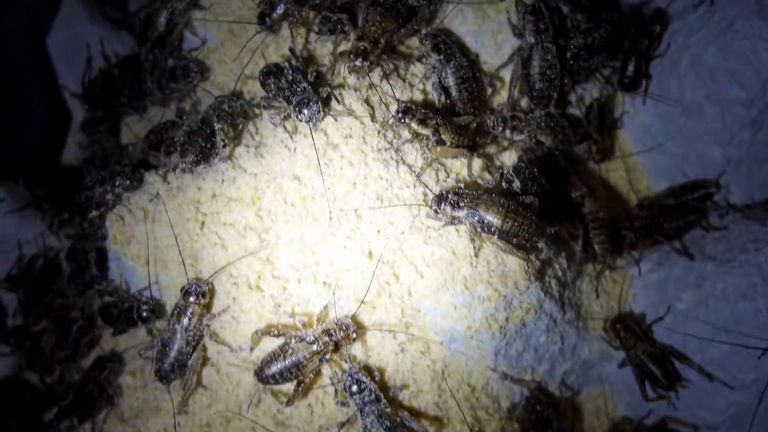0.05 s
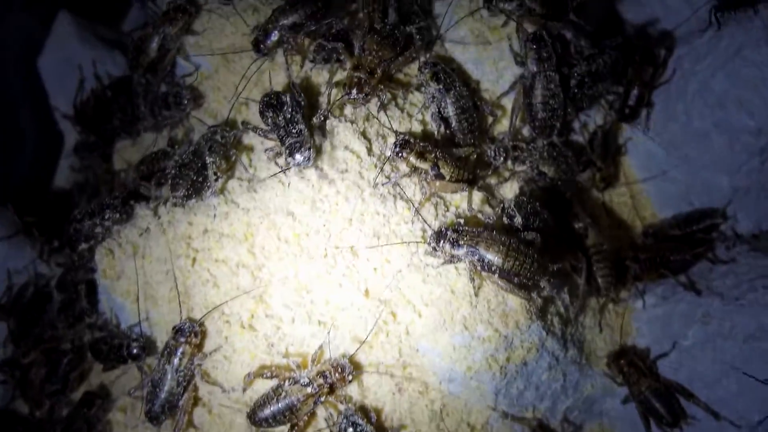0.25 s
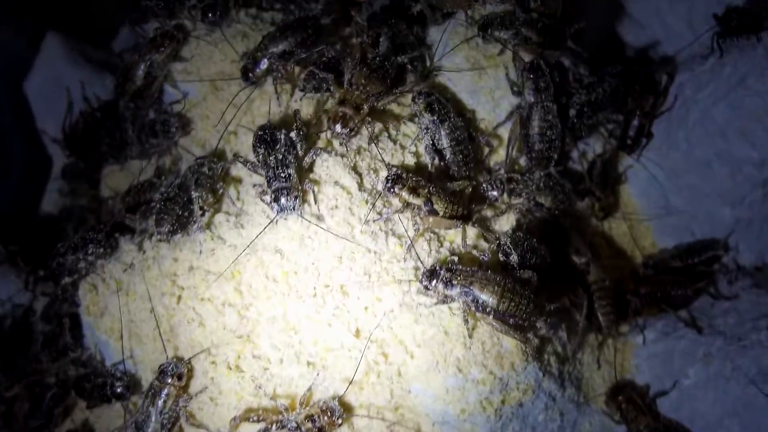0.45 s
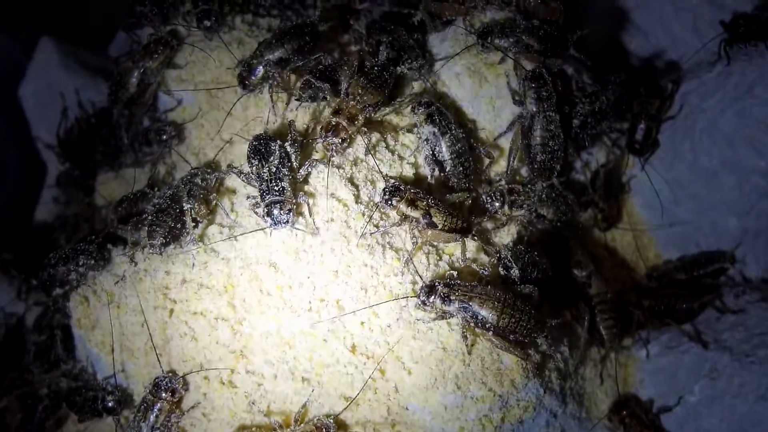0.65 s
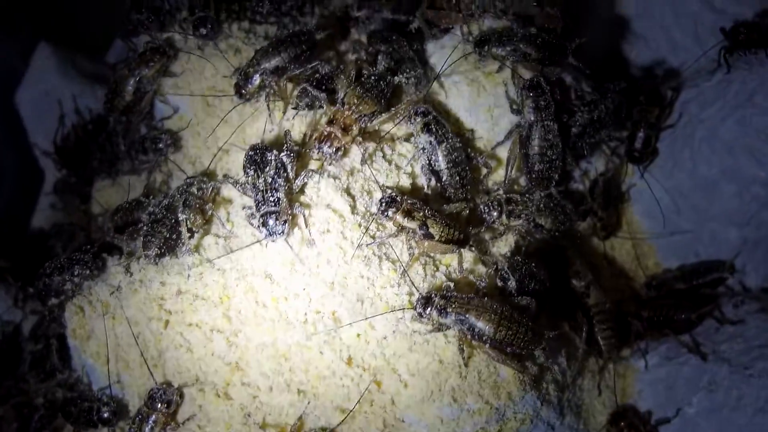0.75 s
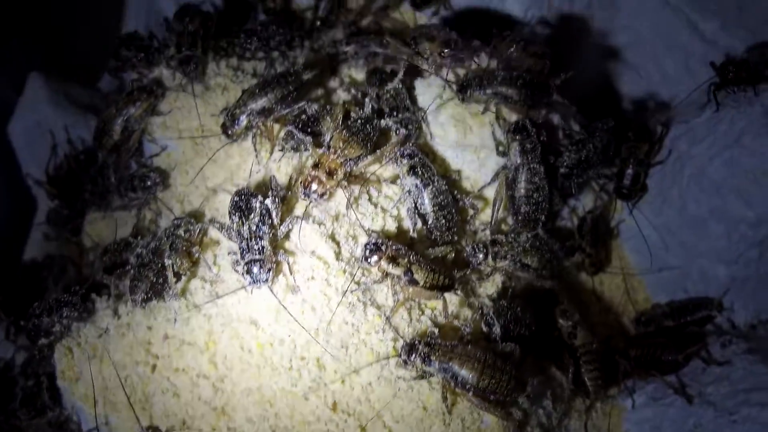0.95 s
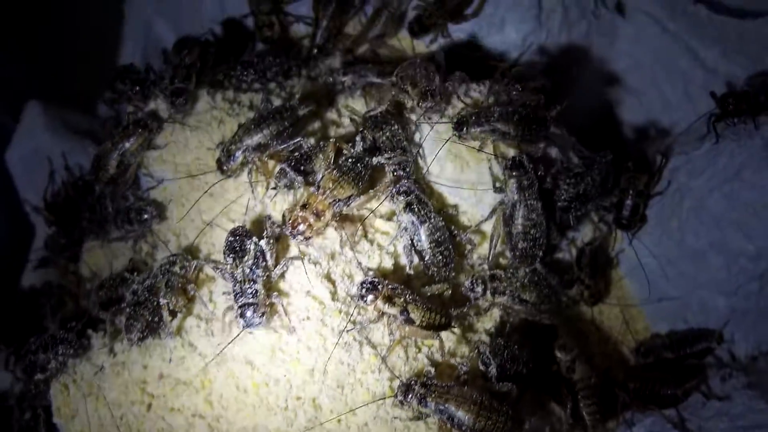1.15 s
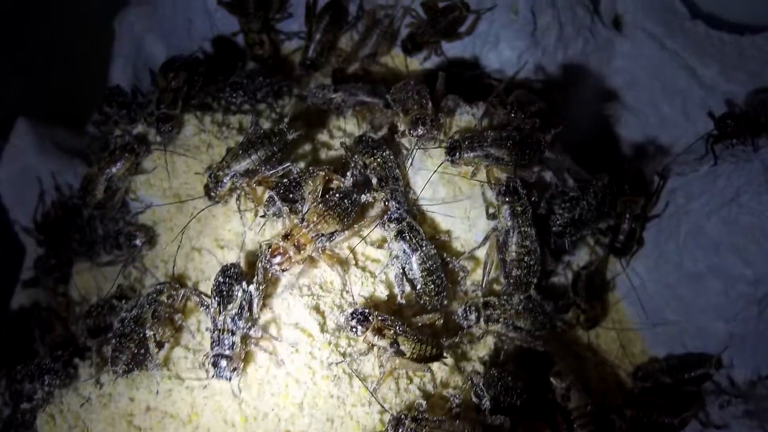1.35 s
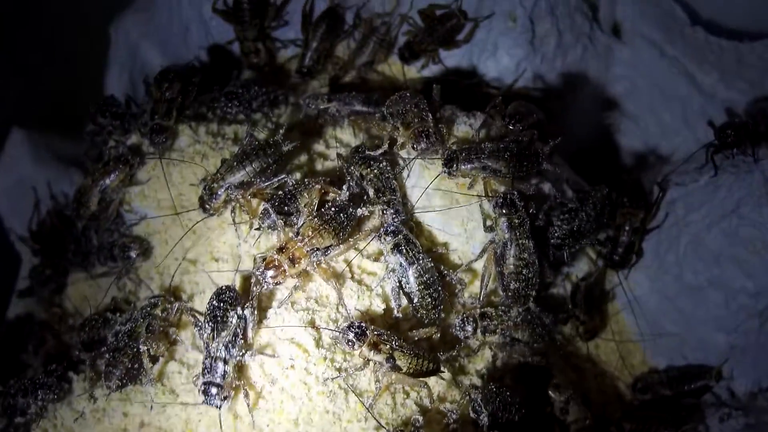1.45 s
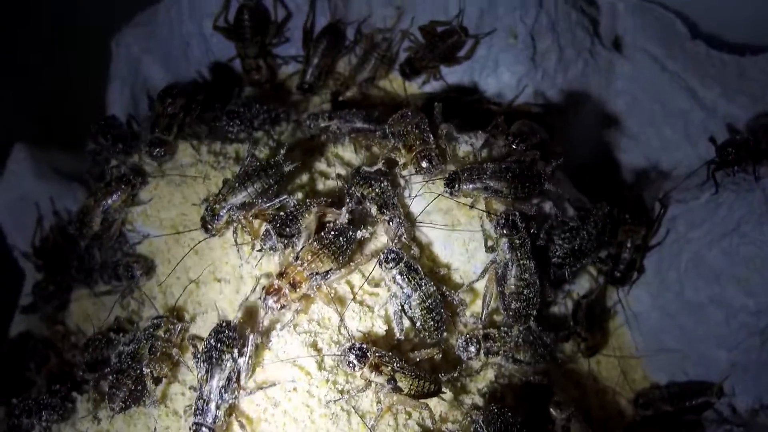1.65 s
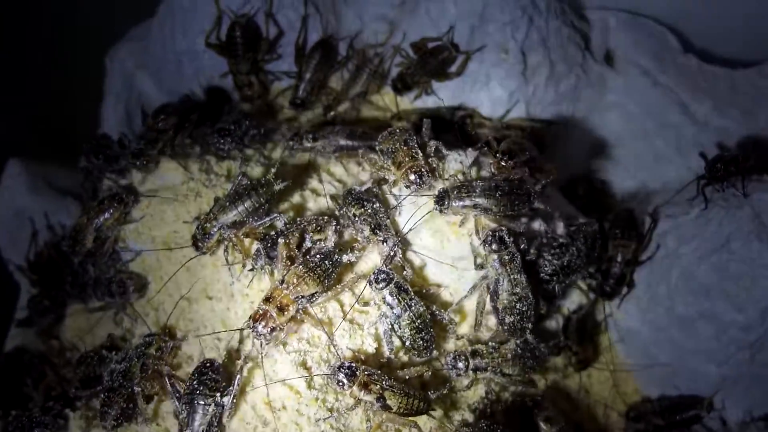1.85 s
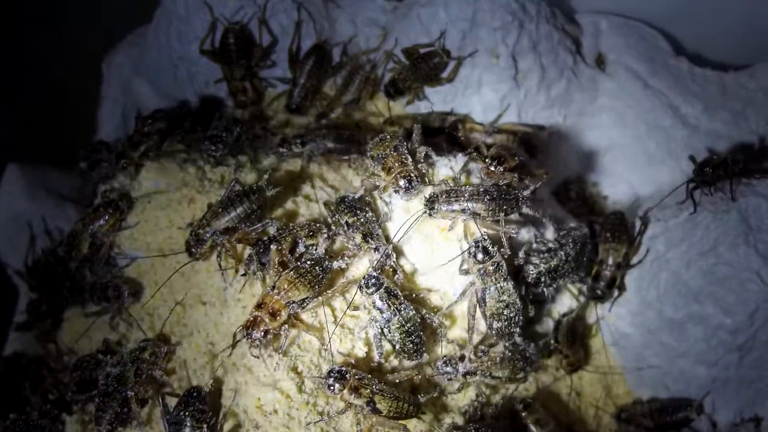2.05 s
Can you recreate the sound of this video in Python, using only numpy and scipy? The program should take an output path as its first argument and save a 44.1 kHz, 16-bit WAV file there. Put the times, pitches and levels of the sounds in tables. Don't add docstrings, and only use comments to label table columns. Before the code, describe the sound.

Crickets crawling in a plastic tub, claws ticking and scraping over low hum, one early hollow knock

```python
import sys
import numpy as np
from scipy import signal
from scipy.fft import rfft, irfft
from scipy.io import wavfile
from scipy.ndimage import uniform_filter1d

SR = 44100
rng = np.random.default_rng(int(sys.argv[2]) if len(sys.argv) > 2 else 0)


def invert_db(x):
    u = np.asarray(x, float) / 20
    return 10 ** u


def materialize(psi):
    bounded = np.clip(np.atleast_2d(psi).T, -1, 1)
    quanta = np.round(bounded * 32767).astype(np.int16)
    wavfile.write(sys.argv[1], SR, quanta)


N = 92610


def band(x, hz, width, times=1):
    hz = min(hz, 0.45 * SR)
    b, a = signal.iirpeak(hz, max(hz / width, 0.3), fs=SR)
    for _ in range(times):
        x = signal.lfilter(b, a, x)
    return x


def level(x, db):
    return x * invert_db(db) / np.sqrt(np.mean(x ** 2))


def walk(rate):
    k = int(SR / rate)
    steps = np.repeat(rng.standard_normal(N // k + 1), k)
    return 1.13 * uniform_filter1d(uniform_filter1d(steps, k), k)[:N]


def shaped(table):
    f = np.arange(N // 2 + 1) * SR / N + 1
    hz, db = np.array(table).T
    colour = np.maximum(np.interp(np.log(f), np.log(hz), db), -90)
    return irfft(rfft(rng.standard_normal(N)) * invert_db(colour), N)


def fade(t, t60):
    return np.exp(-np.log(1000) * t / max(t60, 0.002))


def add(out, start, x):
    i = int(start * SR)
    out[i:i + len(x)] += x[:N - i]


def contacts(table, spread, crack, ring_db):
    out, t = np.zeros(N), np.arange(2048) / SR
    for start, peak_db, hz, t60 in table:
        touch = rng.standard_normal(len(t)) * fade(t, t60)
        touch[0] += crack
        patch = band(touch, hz, hz * spread, times=2)
        ring = band(touch, hz, hz * 0.085)
        x = patch + invert_db(ring_db) * ring
        add(out, start + 0.001, x * invert_db(peak_db) / np.abs(x).max())
    return out


# t/s, level/dB (rms)
HUM_LEVEL = [(0, -44.5), (.5, -46), (1.1, -42.5), (1.6, -46.5), (2.1, -45)]


def hum():
    hum_hz, octave_db, wobble_db = 120.7, -19, 2.16
    whine_hz, whine_db = 12228, -78
    t = np.arange(N) / SR
    times, db = np.array(HUM_LEVEL).T
    phase = 2 * np.pi * np.cumsum(hum_hz * (1 + 0.0019 * walk(3.05))) / SR
    tone = np.sin(phase) + invert_db(octave_db) * np.sin(2 * phase + 1)
    loudness = invert_db(np.interp(t, times, db) + wobble_db * walk(7.1))
    whine = invert_db(whine_db) * np.sin(2 * np.pi * whine_hz * t)
    return np.sqrt(2) * (tone * loudness + whine)


# f/Hz, width/Hz, level/dB (rms)
FAN_RESONANCES = [(83, 8.2, -60), (144.6, 5.7, -58.5), (241.1, 55.5, -55.5), (301.7, 28, -63),
                  (607, 150, -59.5)]


def fan():
    out = np.zeros(N)
    for hz, width, db in FAN_RESONANCES:
        rumble = band(rng.standard_normal(N), hz, width, times=2)
        out += level(rumble, db) * invert_db(2.8 * walk(4.17))
    return out


# f/Hz, level/dB (per Hz)
AIR_COLOUR = [(12, -68), (20, -19.5), (65, -10), (123, -11.5), (167, -5.5), (345, -15.5), (584, -20.5),
              (857, -27), (2500, -35), (3250, -67), (5500, -120)]


def air():
    return level(shaped(AIR_COLOUR), -50) * invert_db(0.42 * walk(3.6))


# f/Hz, level/dB (per Hz)
HISS_COLOUR = [(1200, 1), (1800, -2.5), (4800, -2), (6500, -5.5), (10000, -4.5), (12300, -3), (13400, -7),
               (15200, -11.5)]


def hiss():
    patch_hz, patch_db, flickers_per_s = 14200, -72, 25
    patch = level(band(rng.standard_normal(N), patch_hz, 1800, times=2), patch_db)
    patch = patch * invert_db(9 * np.tanh(3 * walk(flickers_per_s) - 2))
    return level(shaped(HISS_COLOUR), -57.5) * invert_db(0.35 * walk(9.3)) + patch


def feet():
    feet_per_s, feet_db, spread_db, feet_hz, t60_s = 250, -59, 4, 8500, 0.0068
    strength = invert_db(spread_db * np.minimum(rng.exponential(size=N), 3))
    hits = (rng.random(N) < feet_per_s / SR) * strength
    envelope = signal.lfilter([1], [1, -fade(1 / SR, t60_s)], hits)
    return invert_db(feet_db) * band(envelope * rng.standard_normal(N), feet_hz, 13500)


def soft_top():
    f = np.arange(N // 2 + 1) * SR / N
    return irfft(rfft(hiss() + feet()) * (f < 15280), N)


# t/s, level/dB (peak), f/Hz (centre), t60/s (time to die away)
SCRAPES = [(0.0757, -39.5, 2420, 0.028), (0.192, -44, 2410, 0.06), (0.3301, -41, 3640, 0.022),
           (0.4402, -50, 1950, 0.035), (0.5222, -41.5, 2600, 0.039), (0.5566, -37.5, 4820, 0.06),
           (0.5614, -36, 4430, 0.011), (0.7402, -38, 4710, 0.0099), (0.7434, -46, 2200, 0.023),
           (0.9707, -42.5, 4670, 0.035), (1.1403, -37.5, 4840, 0.044), (1.2341, -43, 2470, 0.02),
           (1.265, -41, 3870, 0.06), (1.3843, -43.5, 4970, 0.039), (1.5609, -47, 2710, 0.025),
           (1.5883, -48, 2330, 0.024), (1.8003, -40, 4840, 0.02), (1.915, -48, 2560, 0.02),
           (1.9639, -39, 2060, 0.02), (2.0637, -41.5, 2390, 0.02)]


def scrapes():
    return contacts(SCRAPES, spread=1.97, crack=9, ring_db=10)


# t/s, level/dB (peak), f/Hz (centre), t60/s (time to die away)
REBOUNDS = [
    (.3762, -40, 1400, 0.026),
    (.3795, -34, 830, 0.024),
    (.4205, -51, 700, 0.013),
    (.454, -43, 710, 0.011),
    (.4640, -37, 512, 0.027),
    (2.067, -44.5, 970, 0.015),
    (.185, -41, 640, 0.055),
]


def rebounds():
    return contacts(REBOUNDS, spread=0.67, crack=3, ring_db=16)


# f/Hz, level/dB, t60/s (time to die away)
BODY = [(79, -24, 0.3), (181.5, -13.5, 0.11), (253, -6, 0.091), (316.3, -5, 0.089), (457, -23, 0.067),
        (580, -1, 0.044), (643.7, 2, 0.095), (653.5, -6, 0.26), (750, -30, 0.097), (889, -22, 0.18),
        (1100, -2, 0.041), (1156.5, -9.5, 0.11), (1320, -12.5, 0.13), (1420, -15, .15)]
# t/s, level/dB, tilt/dB (per octave about 650 Hz), main ring/dB, contact/s (time to build up)
BLOWS = [
    (0.2038, -22, -2.05, -4.5, .0015),
    (.2150, -24, -3.7, 8, 0.0024),
    (0.248, -37, -6.5, 3.5, .004),
]


def knock():
    clatter_db, clatter_hz, clatter_t60_s = -23, 2000, 0.22
    room_db, room_t60_s, room_hz = -43.5, 0.29, 700
    out, t = np.zeros(N), np.arange(SR // 2) / SR
    for start, db, tilt_db, main_db, contact in BLOWS:
        ring = np.zeros(len(t))
        for hz, mode_db, t60 in BODY:
            gain_db = mode_db + tilt_db * np.log2(hz / 650) + main_db * (550 < hz < 700)
            ring += invert_db(gain_db) * fade(t, t60) * np.sin(2 * np.pi * (hz * t + rng.random()))
        grit = band(rng.standard_normal(len(t)), 70, 150, times=2)
        rough = 1 + 0.35 * level(grit, 0)
        clatter = band(rng.standard_normal(len(t)), clatter_hz, 1800)
        clatter = band(clatter, clatter_hz, 2000, times=2)
        clatter = level(clatter, clatter_db - main_db) * fade(t, clatter_t60_s)
        build_up = 1 - np.exp(-t / max(contact, 1e-4))
        add(out, start, invert_db(db) * (ring * rough + clatter) * build_up)
    tail = band(rng.standard_normal(len(t)), room_hz, 2000) * fade(t, room_t60_s)
    return out + invert_db(room_db) * signal.fftconvolve(out, tail)[:N]


def boom():
    start_s, boom_hz, boom_db, rise_s, t60_s = 0.218, 142.2, -23, 0.011, 0.22
    t = np.maximum(np.arange(N) / SR - start_s, 0)
    swell = (1 - np.exp(-t / rise_s)) * fade(t, t60_s)
    return invert_db(boom_db) * swell * np.sin(2 * np.pi * boom_hz * t)


# t/s, level/dB (peak), f/Hz (centre), t60/s (time to die away)
TICKS = [(0.2475, -37, 12000, 0.015), (0.262, -37, 13800, 0.015), (0.4399, -45, 7900, 0.018),
         (0.4931, -33.5, 13800, 0.017), (0.5561, -38, 7800, 0.012), (0.5604, -34, 10400, 0.014),
         (0.5794, -41, 11100, 0.02), (0.606, -36, 12000, 0.015), (0.715, -32, 12000, 0.011),
         (0.7372, -46, 6720, 0.014), (0.847, -33, 11600, 0.018), (0.896, -38, 12800, 0.014),
         (0.9333, -38, 13800, 0.014), (0.9723, -41, 11100, 0.014), (1.0069, -28, 13600, 0.014),
         (1.1336, -35, 12200, 0.014), (1.267, -42, 10600, 0.014), (1.3003, -38, 12000, 0.014),
         (1.383, -52, 8880, 0.014), (1.397, -38, 12200, 0.015), (1.4431, -43, 11000, 0.014),
         (1.501, -40, 12300, 0.014), (1.55, -30, 12100, 0.019), (1.5882, -34, 12400, 0.019),
         (1.6014, -41, 10100, 0.014), (1.7997, -39, 9800, 0.014), (1.8382, -42, 11200, 0.019),
         (1.963, -48, 9600, 0.016), (2.0133, -30, 14900, 0.02), (2.0636, -40, 5700, 0.016)]


def ticks():
    return contacts(TICKS, spread=0.67, crack=5.4, ring_db=-11)


# t/s, length/s, f/Hz, level/dB
SQUEAKS = [
    (0.692, 0.018, 2575, -56.5),
    (1.175, 0.026, 2550, -53),
]


def squeaks():
    throb_hz, throb_depth, arch_hz = 105, 0.4, 90
    out = np.zeros(N)
    for start, length, hz, db in SQUEAKS:
        t = np.arange(int(length * SR)) / SR
        arch = np.sin(np.pi * t / length)
        throb = 1 - throb_depth * np.cos(2 * np.pi * throb_hz * t)
        pitch = hz + arch_hz * (arch - 0.7)
        tone = np.sin(2 * np.pi * np.cumsum(pitch) / SR)
        add(out, start, invert_db(db) * arch ** 0.5 * throb * tone)
    return out


def scene():
    background = hum() + fan() + air() + soft_top()
    crickets = scrapes() + ticks() + squeaks()
    knocking = rebounds() + knock() + boom()
    return (background + crickets + knocking)[None]


def low_pass(x):
    return signal.sosfilt(signal.butter(12, 16530, fs=SR, output="sos"), x)


def record(dry):
    dip_s, dip_length_s, dip_db, dip_top_hz = 0.1965, 0.0072, -13, 3500
    top_hz, above_top_db = 15280, -24
    t, f = np.arange(N) / SR, np.arange(N // 2 + 1) * SR / N
    in_dip = 1.0 * ((t > dip_s) & (t < dip_s + dip_length_s))
    dip = uniform_filter1d(in_dip, size=60)
    low = irfft(rfft(dry) / (1 + (f / dip_top_hz) ** 4), N)
    dipped = dry - low * (1 - invert_db(dip_db * dip))
    treble_cut = np.where(f < top_hz, 1, invert_db(above_top_db))
    mix = irfft(rfft(dipped) * treble_cut, N)
    return low_pass(mix)


dry = scene()
out = record(dry)
materialize(out)
```